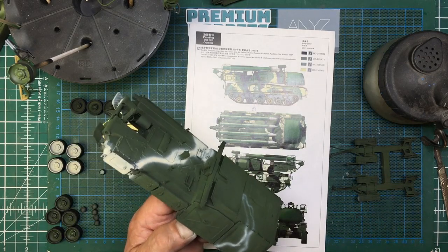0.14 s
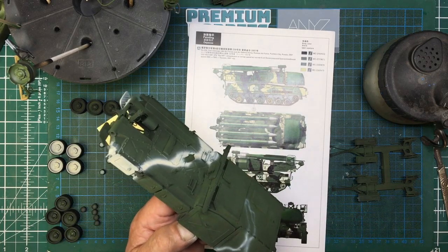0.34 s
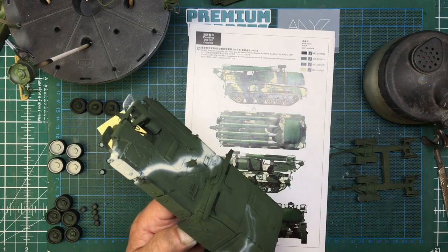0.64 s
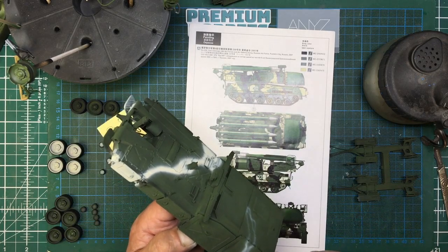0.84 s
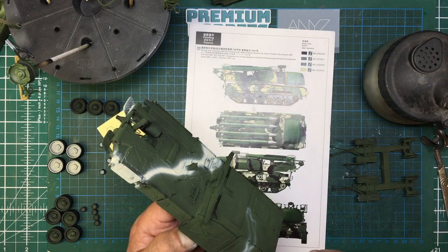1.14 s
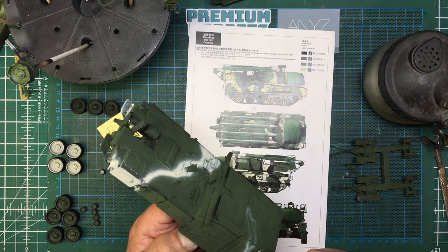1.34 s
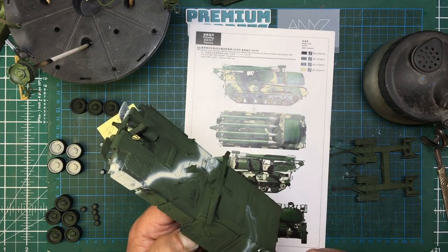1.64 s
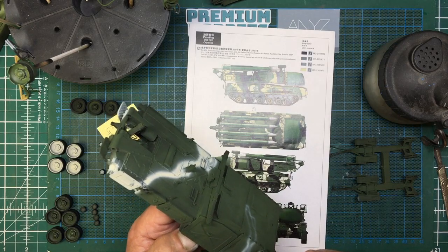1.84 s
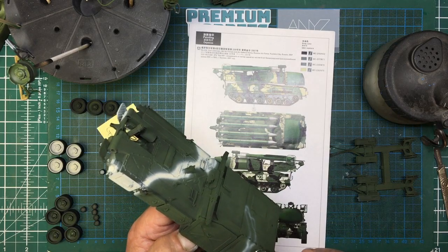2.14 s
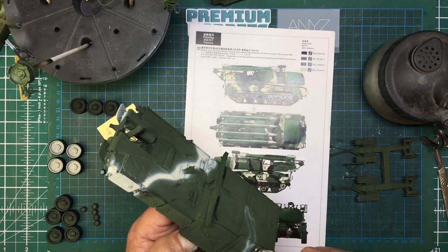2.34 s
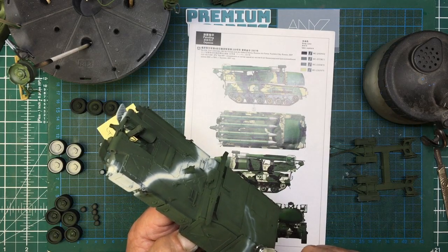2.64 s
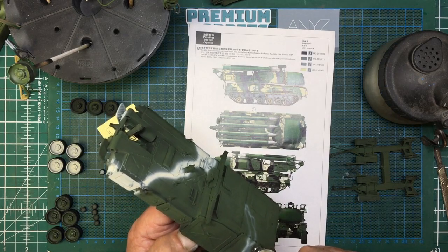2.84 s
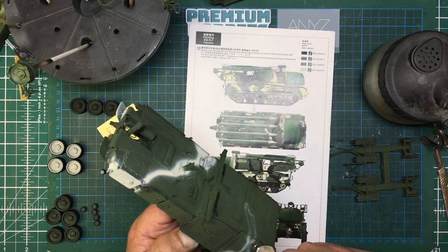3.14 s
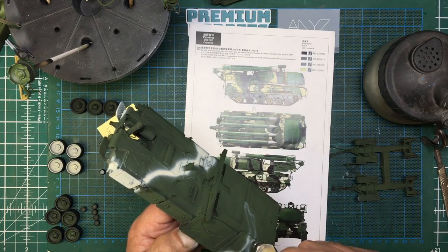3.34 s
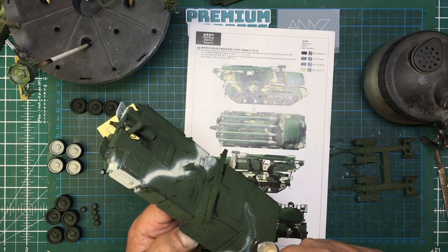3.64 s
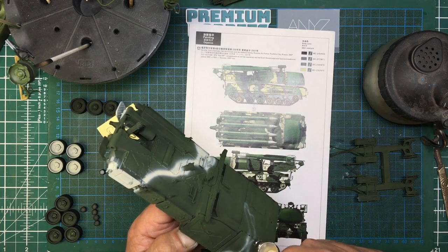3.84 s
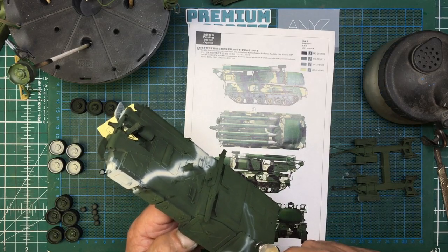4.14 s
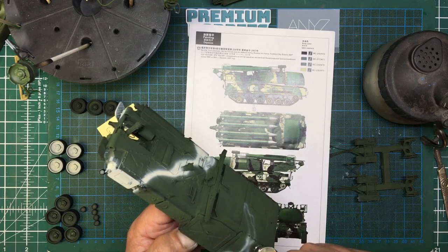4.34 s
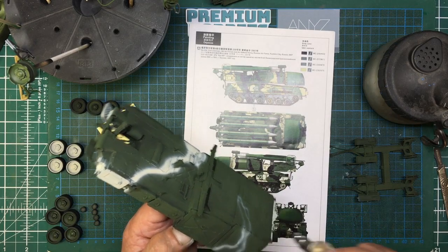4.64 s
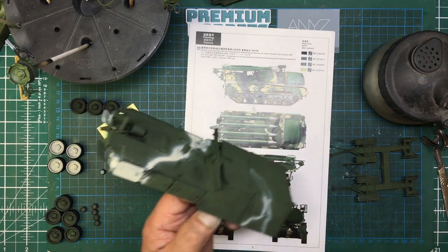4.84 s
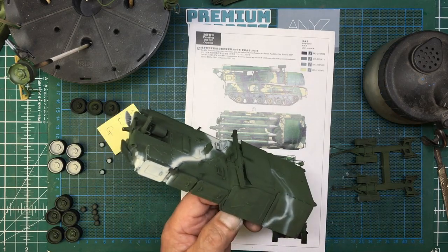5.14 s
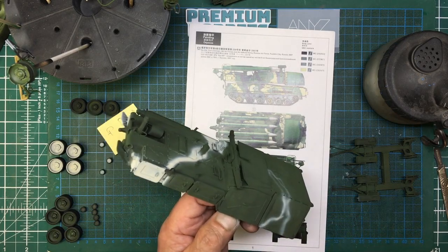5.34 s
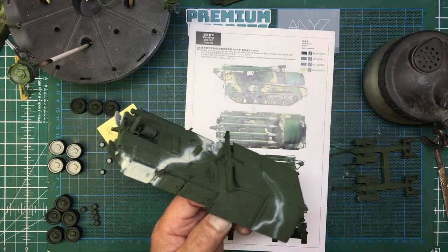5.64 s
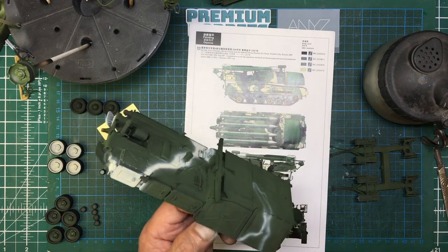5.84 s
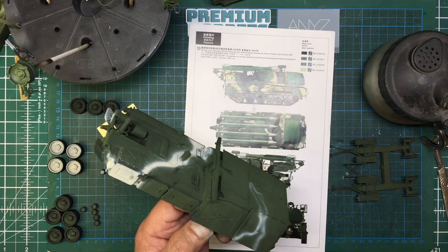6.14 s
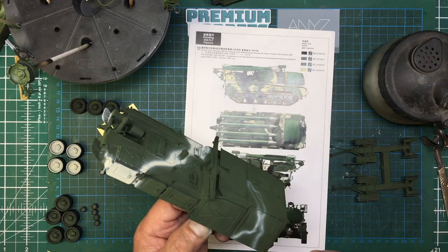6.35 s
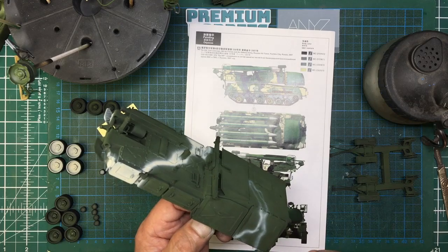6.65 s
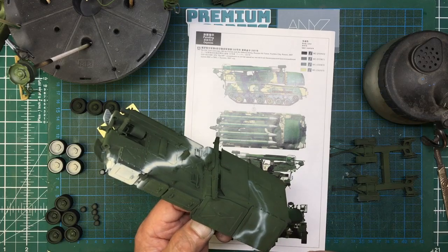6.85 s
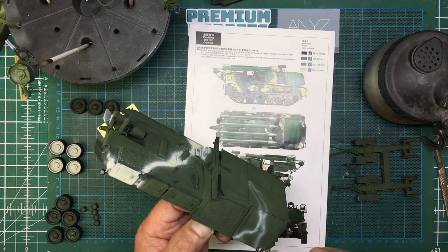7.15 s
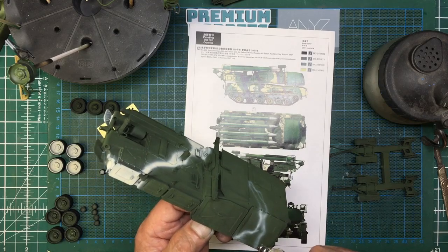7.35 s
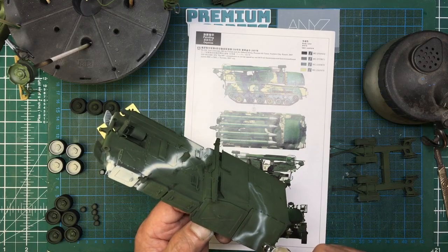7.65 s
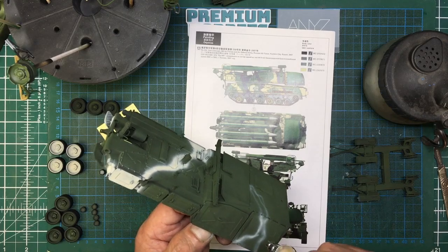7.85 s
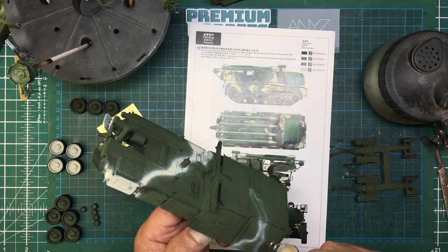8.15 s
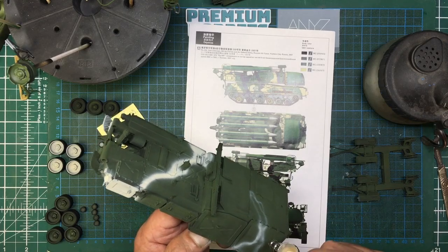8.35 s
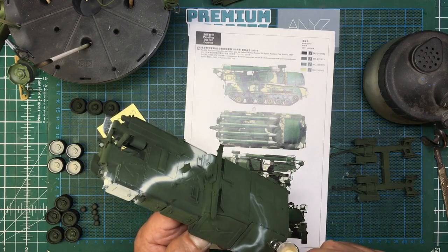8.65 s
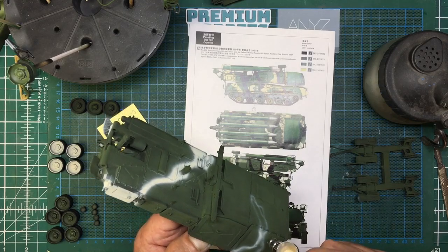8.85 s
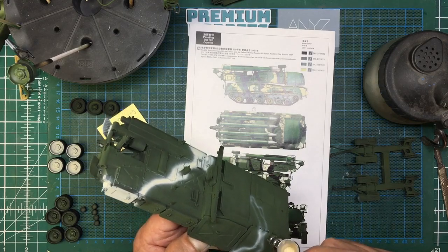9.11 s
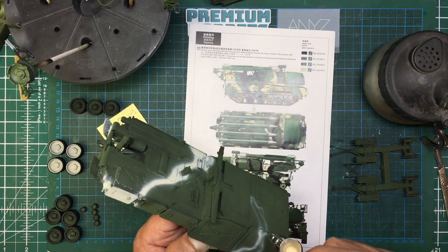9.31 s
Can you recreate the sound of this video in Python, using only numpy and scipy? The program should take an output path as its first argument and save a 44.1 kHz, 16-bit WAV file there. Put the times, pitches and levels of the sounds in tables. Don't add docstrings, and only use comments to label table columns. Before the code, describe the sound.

Airbrush hiss is already running, then stops at about 0.17 s with a small double tick. Spray returns at 0.32 s and holds until 4.6 s, rustling around hollow plastic, turning edgy and breathy, and swelling as the nozzle swings near at 1.5, 2.6 and 3.8 s. Brief chirps occur around 1.5 s, with a stronger cluster of rising whistles near 4.25 s. After a pause, a tiny dab at 5.0 s leads straight into spray until 5.6 s, ended by the sharpest trigger click. A light tick at 6.1 s starts the last spray, fluttering strongly until 7 s and continuing to the end around 9.5 s. A small compressor throbs at 1.55-2.45, 4.25-5.05 and 7.6-8.5 s, low and fast, buzzing and knocking. Quiet room air and faint hum remain; close overhead, near mono, little reverberation.

```python
import sys
import numpy as np
from scipy import signal
from scipy.fft import rfft, irfft, next_fast_len
from scipy.io import wavfile

SR = 44100
rng = np.random.default_rng(int(sys.argv[2]) if len(sys.argv) > 2 else 0)


def materialize(psi):
    bounded = np.clip(np.atleast_2d(psi).T, -1, 1)
    quanta = np.round(bounded * 32767).astype(np.int16)
    wavfile.write(sys.argv[1], SR, quanta)


def attenuation_scalar(level_db):
    decades = np.asarray(level_db, float) / 20
    return 10 ** decades


N = 418068

# (switch on [s], up to speed [s], switch off [s], shaft rate [turns/s],
# a piston stroke [s], a trough of the magnet buzz [s])
COMPRESSOR_RUNS = [
    (1.55, 1.635, 2.44, 23.525, 1.7416, 1.7479),
    (4.26, 4.33, 5.035, 23.53, 4.4481, 4.4514),
    (7.6, 7.655, 8.475, 23.54, 7.7573, 7.7847),
]


def amp_of(points, hz):
    p = np.array(points, float)
    return attenuation_scalar(np.interp(np.log(hz + 1), np.log(p[:, 0]), p[:, 1]))


def rms_one(x):
    return x / np.sqrt(np.mean(x ** 2) + 1e-20)


def resonances(peaks, hz):
    power = sum(attenuation_scalar(db) ** 2 / (1 + (2 * (hz - f) / w) ** 2) ** 0.964 for f, w, db in peaks)
    return np.sqrt(power) / (1 + (.5 * peaks[0][0] / (hz + 1)) ** 4)


def filtered(x, gain_at):
    size = next_fast_len(N)
    hz = np.arange(size // 2 + 1) * SR / size
    return irfft(rfft(x, size) * gain_at(hz), size)[..., :N]


def coloured(gain_at):
    return rms_one(filtered(rng.standard_normal(next_fast_len(N)), gain_at))


def drift(rate):
    r = np.exp(-2 * np.pi * rate / SR)
    return rms_one(signal.lfilter([1], [1, -2 * r, r * r], rng.standard_normal(N + SR))[SR:])


def ring(clicks, hz, t60):
    r, w = attenuation_scalar(-60 / (t60 * SR)), 2 * np.pi * hz / SR
    return signal.lfilter([0, np.sin(w)], [1, -2 * r * np.cos(w), r * r], clicks + 1e-18)


def switch(on, off, rise_s, fall_s):
    t = np.arange(N) / SR
    rise = 1 - np.exp(-np.maximum(t - on, 0) / rise_s)
    return rise * np.exp(-np.maximum(t - off, 0) / fall_s)


def swings():
    # (closest time [s], stroke length [s], rise of the jet [dB], rise in the hollows [dB])
    strokes = [(0.041, 0.087, 2.5, 4), (0.428, 0.406, 2.5, 1.5), (1.352, 0.19, 2.5, -2),
               (1.501, 0.304, 7, 5.5), (1.649, 0.253, 6.5, 7.5), (1.798, 0.18, 0.5, 2.5),
               (2.581, 0.352, 6, -1), (2.739, 0.273, 5.5, 4), (3.739, 0.47, 4.5, -1.5), (3.916, 0.31, 4, 1),
               (4.268, 0.236, 8, 1), (4.528, 0.168, 7.5, 5.5), (5.216, 0.236, 1.5, 1.5),
               (5.431, 0.172, 0, 3.5), (6.393, .16, 0, 7), (6.575, 0.245, 3.5, 7), (6.753, 0.266, 8, 4.5),
               (6.855, .08, -3, -5), (6.967, 0.245, 5.5, 8.5), (4.575, .04, 0, 12), (7.15, .08, 2, 2),
               (8.03, 0.245, 3, 1), (9.22, 0.2, 3, 1), (9.36, .12, 2, 1)]
    t = np.arange(0, N / SR + .01, .005)
    rises = 0
    for closest, length, *rises_db in strokes:
        swell = np.cos(np.pi * np.clip((t - closest) / length, -.5, .5)) ** 2
        rises = rises + np.outer(rises_db, swell)
    return [np.interp(np.arange(N) / SR, t, db) for db in rises]


def spray():
    # (valve opens [s], valve shuts [s], pressure [dB], opening time [s])
    pulls = [
        (-1, .174, 0, .003),
        (.32, 4.59, 0, .012),
        (4.995, 5.025, -6, .002),
        (5.035, 5.584, 0, .012),
        (6.081, 10, 0, .003),
    ]
    # (time [s], nearness of nozzle [dB], aim into hollows [dB], aim across edges [dB])
    hand = [(0, -7, 5.5, -11), (.17, -4, -8, -11), (.33, -2.5, 8, 0.5), (.6, -6, 7, 4),
            (.8, -6.5, -2.5, 10.5), (1.3, -3, -10.5, 10.5), (2.0, -2.5, -10, 8.5), (2.9, 0.5, -16.5, 2),
            (4.1, 2, -17, 1.5), (4.6, -0.5, -18, 4), (5.05, -4.5, -2.5, 3.5), (5.58, -5, -4, 0.5),
            (6.22, -5.5, -4, -10), (6.36, -0.5, 6.5, 10.5), (7.75, -0.5, 1.5, 3.5), (8.1, -4, -5.5, 9.5),
            (8.8, -2, -10.5, 8), (9.48, 4, -9.5, 6.5)]
    # (time [s], level [dB])
    plates = [(0, 2), (.17, -2), (.6, 0), (1.2, 1), (1.5, -3), (2.5, 0), (3.4, 2), (4.5, 0), (5.1, -1),
              (5.55, 2), (6.24, -3), (6.36, 3), (7.0, 2), (7.3, -2), (8.4, 0), (8.7, -4), (9.1, -5),
              (9.48, -4)]
    # (frequency [Hz], level [dB per Hz])
    free_jet = [(880, -53.5), (1500, -25.5), (1900, -22), (2250, -12), (2650, -11), (3800, -16),
                (4670, -17), (5800, -3), (8500, -0.5), (10400, -1.5), (15600, -7.5)]
    # (frequency [Hz], level [dB per Hz])
    plate_wash = [(150, -19), (300, -14), (600, -3.5), (1100, -4.5), (1350, -5), (1650, -2), (2600, 1.5),
                  (4500, -10.5), (9000, -21.5)]
    # (frequency [Hz], width [Hz], level [dB])
    hollow_modes = [(1122, 29, -5.5), (1857.2, 96.2, 4), (2037, 70, 1.5), (2301.5, 140, -0.5),
                    (3356, 250, -4), (3700, 100, -16), (4405, 440, 0), (5636, 130, -15.5),
                    (5930, 120, -33.5), (6984, 350, -2), (7480, 28, -9.5), (7930, 49, -10), (8210, 60, -4),
                    (9300, 510, -7), (11400, 120, -21.5), (12800, 250, -13)]
    # (frequency [Hz], width [Hz], level [dB])
    edge_modes = [(5077, 69, 1), (5506, 50, 0.5), (6200, 40, -4.5), (7070, 63, -13), (7465, 52, -2.5),
                  (7844, 81, -5.5), (8290, 69, -5), (8620, 99, -7), (8960, 110, -7.5), (10940, 44, -14.5),
                  (12200, 140, -23), (12800, 110, -16), (12400, 42.5, -10.5)]
    # (frequency [Hz], level [dB per Hz])
    edge_bed = [(2500, -26), (3500, -5.5), (5000, -9), (5600, -3.5), (9500, -6.5), (10400, -26),
                (12500, -24.5), (15800, -19)]

    t = np.arange(N) / SR
    flow = sum(attenuation_scalar(db) * switch(on, off, open_s, fall_s=0.007) for on, off, db, open_s in pulls)
    hand_s, *columns = np.transpose(hand)
    near, into, across = [np.interp(t, hand_s, c) for c in columns]
    plate_db = np.interp(t, *np.transpose(plates))
    jet_rise, hollow_rise = swings()
    spatter = 0.616 * drift(8.0) + 0.7 * drift(410)

    free_db = -43.5 + near + jet_rise + spatter
    hollow_db = -46 + near + into + hollow_rise + 0.98 * spatter + 0.65 * drift(28)
    edge_db = -52 + near + across + 0.8 * jet_rise + 0.93 * spatter + 0.88 * drift(25)
    wash_db = -54 + plate_db + np.minimum(0.614 * into, 5.5) - 0.26 * across - 0.22 * jet_rise + spatter

    free = attenuation_scalar(free_db) * coloured(lambda hz: amp_of(free_jet, hz))
    hollow = attenuation_scalar(hollow_db) * coloured(lambda hz: resonances(hollow_modes, hz))
    edge = attenuation_scalar(edge_db) * coloured(lambda hz: np.hypot(resonances(edge_modes, hz), amp_of(edge_bed, hz)))
    wash = attenuation_scalar(wash_db) * coloured(lambda hz: amp_of(plate_wash, hz))
    return flow * (free + hollow + edge + wash)


def desk(x):
    # (frequency [Hz], width [Hz], gain [dB])
    desk_dips = [(2840, 91, -2.5), (2206, 69, -6.5), (3865, 120, 1.5), (5120, 320, -0.5), (5243, 100, -4),
                 (6390, 100, -2), (7654, 140, -1.5), (8853, 120, -4), (11300, 150, -1), (10488, 570, -6.5),
                 (13800, 300, 1), (14960, 1100, -2.5)]

    def gain_at(hz):
        return attenuation_scalar(sum(db / (1 + (2 * (hz - f) / w) ** 2) for f, w, db in desk_dips))

    return filtered(x, gain_at)


def singing():
    # (start [s], length [s],
    # frequency [Hz], width [Hz], level [dB])
    sung_parts = [(.7, 1.437, 2537, 400, -60), (0.75, 1.23, 3792, 200, -59.5), (0, 0.08, 1830, 150, -50),
                  (0, .1, 1600, 300, -57), (0, .17, 2080, 200, -56), (.33, .08, 1950, 300, -47),
                  (.33, .06, 4300, 500, -50), (.445, .03, 4350, 400, -45), (0.341, 0.34, 1594, 350, -55),
                  (.34, 0.239, 2670, 350, -49), (.34, 0.19205, 5464, 200, -51.5),
                  (.335, 0.21, 4440, 350, -48.5), (6.351, 1.41, 4477, 200, -52),
                  (0.699, 0.462, 5700, 201, -60), (.75, 0.66, 8300, 250, -71), (2.5, .13, 5570, 90, -49),
                  (2.565, .1, 6050, 350, -44), (2.68, .07, 5900, 300, -49), (2.55, .06, 8300, 1200, -48),
                  (2.74, .08, 7900, 200, -50), (2.531, 0.084, 7050, 250, -44.5),
                  (2.901, 0.81, 8660, 250, -53.5), (3.6, 0.38, 8400, 350, -49),
                  (3.6, 0.47, 9550, 250.2, -52.5), (5.081, 0.12, 4140, 500, -55),
                  (5.103, 0.424, 6720, 597, -55.5), (5.06, 0.53, 12600, 900, -60),
                  (5.06, .53, 14200, 1800, -58), (8.65, 0.45, 5740, 220, -56), (9.0, .26, 5700, 300, -52),
                  (9.3, .25, 5760, 200, -50), (9.13, 0.17, 9050, 200, -50), (9.33, .2, 9050, 250, -51),
                  (9.14, .28, 6320, 150, -53), (9.05, .5, 7350, 300, -54), (8.9, .6, 2480, 250, -62),
                  (9.34, .07, 4200, 300, -52), (9.0, .5, 5350, 120, -58), (4.755, .12, 3800, 50, -65),
                  (2.8, 1.0, 2520, 120, -65), (2.8, 1.0, 3600, 200, -62), (5.2, .1, 2030, 150, -58),
                  (5.43, .07, 1950, 400, -57), (4.64, .05, 3720, 60, -70), (3.62, .16, 12500, 900, -56),
                  (3.64, .14, 14200, 200, -62), (4.2, .12, 12300, 700, -54), (1.62, .06, 6000, 250, -49),
                  (6.27, .07, 2050, 400, -54), (6.36, .07, 4350, 400, -45), (6.54, .08, 4500, 400, -45),
                  (6.09, .2, 1900, 300, -62), (6.7, .1, 9300, 500, -49), (6.95, .1, 2000, 400, -47),
                  (6.45, 1.1, 6950, 600, -50), (6.5, .6, 8900, 1200, -50), (5.385, .03, 7200, 400, -48),
                  (6.06, .5, 750, 800, -61)]
    out = np.zeros(N)
    for start_s, length, hz, width_hz, db in sung_parts:
        start, full = round(start_s * SR), round(length * SR)
        n = min(full, N - start)
        r = np.exp(-np.pi * width_hz / SR)
        chance = signal.lfilter([1], [1, -2 * r, r * r], rng.standard_normal((2, full)))
        chance = rms_one(chance)[:, :n]
        angle = 2 * np.pi * hz * np.arange(n) / SR
        tone = chance[0] * np.cos(angle) + chance[1] * np.sin(angle)
        out[start:start + n] += attenuation_scalar(db) * signal.windows.tukey(n, .4) * tone
    return out


def room(x):
    t = np.arange(round(.5 * SR)) / SR
    t60_s = 0.192
    tail = rng.standard_normal(len(t)) * attenuation_scalar(-60 * t / t60_s) * (t > .003)
    tail = signal.lfilter(*signal.butter(1, 7000, fs=SR), tail)
    return signal.fftconvolve(x, tail / np.sqrt(np.sum(tail ** 2)))[:N]


def room_tone():
    # (frequency [Hz], level [dB rms])
    hum_tones = [(99.9, -76), (120.0, -76), (238, -89.5)]
    # (frequency [Hz], level [dB per Hz])
    room_air = [(15, -47.5), (25, -23.5), (43, -13.5), (76, -6), (107, -13.5), (130, -9), (174, -13.5),
                (235, -15), (261, -17.5), (316, -14.5), (500, -23.5), (6850, -35.5), (15800, -41.5)]
    t = np.arange(N) / SR
    hum = sum(np.sqrt(2) * attenuation_scalar(db) * np.sin(2 * np.pi * (hz * t + rng.random())) for hz, db in hum_tones)
    return attenuation_scalar(-70.5) * coloured(lambda hz: amp_of(room_air, hz)) + hum


def valve():
    # (time [s], peak level [dB])
    trigger_clicks = [
        (0.1755, -37),
        (0.178, -33),
        (0.2524, -64),
        (4.996, -44.5),
        (5.5881, -23.5),
        (6.0842, -45.5),
    ]
    # (frequency [Hz], level [dB], t60 [s])
    body_modes = [(3550, -2, 0.003), (4300, -5, 0.002), (5000, -2, 0.0017), (5600, 0, .002),
                  (6500, 1, 0.002), (7500, -4, 0.0015), (8800, -2, 0.0018), (9500, 0, .002),
                  (14970, -6.5, .002)]
    clicks = np.zeros(N)
    clicks[[round(s * SR) for s, db in trigger_clicks]] = attenuation_scalar(np.array(trigger_clicks)[:, 1])
    clicks = clicks + attenuation_scalar(-10.5) * np.roll(clicks, round(0.0036 * SR))
    puff_s, strike_db = .0011, 9
    puff_shape = np.exp(-np.arange(round(.012 * SR)) / SR / puff_s)
    puff = signal.fftconvolve(clicks, puff_shape)[:N]
    puffs = puff * rng.choice([-1, 1], (len(body_modes), N))
    ticks = 0
    for air, (hz, db, t60) in zip(puffs, body_modes):
        ticks = ticks + attenuation_scalar(db) * ring(air + attenuation_scalar(strike_db) * clicks, hz, t60)
    return attenuation_scalar(-17.0) * signal.sosfilt(signal.butter(4, 2900, "high", fs=SR, output="sos"), ticks)


def split_bands(mono):
    split_moments = [.553, .578, .785, 1.387, 1.55, 1.737, 2.132, 2.342, 2.411, 2.852, 3.339, 3.64, 5.336,
                     5.745, 5.801, 6.032, 6.265, 7.634, 7.845, 7.89, 8.099, 8.286, 8.33, 8.959, 9.284]
    low_hz, high_hz, width_hz, second_chance = 4700, 14500, 1500, .45
    side, n = np.zeros(N), round(.04 * SR)
    hz = np.arange(n // 2 + 1) * SR / n
    for s, (first, second, both) in zip(split_moments, rng.random((len(split_moments), 3))):
        start = round(s * SR) - n // 2
        at = slice(start, start + n)
        places = np.array([first ** 2, second][:1 + (both < second_chance)])
        centres = low_hz + (high_hz - low_hz) * places
        inside = np.any(abs(hz - centres[:, None]) < width_hz / 2, axis=0)
        side[at] += attenuation_scalar(-0.5) * np.hanning(n) * irfft(rfft(mono[at][::-1]) * inside, n)
    return side


def whistles():
    # (start [s], length [s], first frequency [Hz], last frequency [Hz], level [dB])
    edge_whistles = [
        (1.457, 0.032, 6000, 6300, -33),
        (1.458, 0.024, 5500, 5490, -37.5),
        (1.51, 0.035, 5600, 5897, -43),
        (4.225, 0.0112, 5450, 5640, -35),
        (4.231, 0.021, 6150, 6300, -27),
        (4.253, 0.0146, 6030, 6407, -26),
        (4.277, 0.0072, 5970, 6300, -28),
        (4.285, 0.0122, 6760, 7174, -30.5),
        (4.287, 0.0166, 8200, 9700, -25.5),
    ]
    out, wobble = np.zeros(N), drift(250)
    for start_s, length, first_hz, last_hz, db in edge_whistles:
        start, n = round(start_s * SR), round(length * SR)
        at = slice(start, start + n)
        hz = np.linspace(first_hz, last_hz, n) + 90 * wobble[at]
        loudness = attenuation_scalar(db - 2 + 3.3 * wobble[::-1][at]) * np.hanning(n) ** 0.33
        out[at] += loudness * np.sin(2 * np.pi * np.cumsum(hz) / SR)
    return out


def compressor():
    # (multiple of the shaft rate, level [dB rms])
    shaft_orders = [(2, -50), (3, -62), (4, -54), (5, -72), (6, -70), (7, -82), (8, -74), (9, -79),
                    (10, -72), (11, -82), (12, -83), (13, -66), (14, -75), (15, -71), (20, -71), (24, -71),
                    (26, -75), (28, -78), (30, -77), (38, -76), (39, -61.5), (40, -59), (41, -72),
                    (42, -71), (43, -72), (44, -69), (45, -74), (46, -76), (47, -77), (49, -72), (50, -76),
                    (53, -78), (54, -75), (57, -76)]
    # (frequency [Hz], width [Hz], level [dB])
    casing_modes = [(932.5, 50, -14), (1265, 160, -18.5), (1760, 81, -22), (2259, 60, -24)]
    # (frequency [Hz], width [Hz], level [dB])
    cowl_modes = [(3705, 70, -7.5), (3805, 56, -7), (4175.3, 50, -21), (5190, 220, -17), (6910, 170, -20),
                  (8100, 65, -20), (8470, 120, -24), (9850, 60, -22.5), (10950, 40, -25), (13110, 80, -24),
                  (13763, 40, -24)]
    # (frequency [Hz], level [dB per Hz])
    motor_air = [(88, -29), (150, -11), (700, -19), (950, -19), (1500, -25), (2300, -26.5), (2900, -39),
                 (13500, -41), (14500, -52), (15300, -65)]
    # (cycles added per shaft turn, level [dB rms])
    buzz_sides = [(-1, -77), (1, -74), (2, -68.5), (4, -78)]
    # (time [s], frequency [Hz], level [dB])
    foot_jolts = [
        (1.635, 93.4, -46.5),
        (4.327, 95, -53.5),
        (5.0, 89.2, -48),
        (5.06, 92, -54),
        (4.37, 95, -56),
        (7.664, 93.8, -51),
    ]
    t, out = np.arange(N) / SR, np.zeros(N)
    rattle = attenuation_scalar(-62.5) * coloured(lambda hz: resonances(casing_modes, hz))
    fan_db = -63.5 + 1.13 * drift(9.1)
    fan = attenuation_scalar(fan_db) * coloured(lambda hz: resonances(cowl_modes, hz) / (1 + (hz / 14200) ** 24))
    air = attenuation_scalar(-63.5) * coloured(lambda hz: amp_of(motor_air, hz))
    shake = attenuation_scalar(1.2 * drift(23.8))

    for on, fast, off, rate, stroke, trough in COMPRESSOR_RUNS:
        at = slice(round((on - .05) * SR), round((off + .5) * SR))
        turns = rate * (t[at] - stroke)
        buzz = 99.86 * (t[at] - trough)
        body = switch(on + 0.03, off - .02, rise_s=0.06, fall_s=0.1)
        body = (body * switch(on, off + .09, rise_s=.02, fall_s=.04))[at]
        works = switch(fast - .025, off - .02, rise_s=0.028, fall_s=0.045)[at] ** 2
        strain = attenuation_scalar(8.0 * np.exp(-np.maximum(t[at] - fast, 0) / .2))

        for k, db in shaft_orders:
            if k > 22:
                lag = .05 * (k - 39) + .0875 * max(k - 40, 0) ** 2
            elif k > 4.5:
                lag = .018 * (k - 4)
            else:
                lag = 0
            swell = body if k < 3.5 else works if k < 4.5 else works * shake[at]
            out[at] -= np.sqrt(2) * attenuation_scalar(db) * swell * np.cos(2 * np.pi * (k * turns - lag))

        magnet = switch(on, off, rise_s=.04, fall_s=0.039)[at]
        out[at] -= np.sqrt(2) * attenuation_scalar(-57) * magnet * np.cos(2 * np.pi * buzz)
        for k, db in buzz_sides:
            out[at] -= np.sqrt(2) * attenuation_scalar(db) * works * np.cos(2 * np.pi * (buzz + k * turns - .07 * k))

        pulse = np.cos(2 * np.pi * (turns - .1))
        knocked = rattle[at] * strain * attenuation_scalar(3.36 * pulse)
        out[at] += works * (knocked + fan[at] * attenuation_scalar(0.97 * pulse) + air[at])

    for s, hz, db in foot_jolts:
        out += attenuation_scalar(db + 7.5) * np.exp(-.5 * ((t - s) / 0.01525) ** 2) * np.sin(2 * np.pi * hz * (t - s))
    return out


def knocks():
    # (frequency [Hz], level [dB], t60 [s], slaps per turn)
    knock_modes = [(2285, -58, .09, 1), (1780, -57, .035, 2), (1690, -64, .04, 2)]
    place, spread_db = -.24, 2.2
    out = np.zeros(N)
    slap = np.hanning(round(.008 * SR))
    for hz, db, t60, slaps in knock_modes:
        times = []
        for on, fast, off, rate, stroke, trough in COMPRESSOR_RUNS:
            first = stroke + (place - np.floor((stroke - fast) * rate)) / rate
            times.append(np.arange(first, off, 1 / rate / round(slaps)))
        s = np.concatenate(times)
        clicks = np.zeros(N)
        clicks[(s * SR).astype(int)] = attenuation_scalar(db + spread_db * rng.standard_normal(len(s)))
        push = slap * np.cos(2 * np.pi * hz * np.arange(len(slap)) / SR) * 2 / slap.sum()
        out += ring(signal.oaconvolve(clicks, push)[:N], hz, t60)
    return out


def scene():
    brush = desk(spray()) + singing() + whistles() + valve()
    mono = brush + attenuation_scalar(-13.5) * room(brush) + compressor() + knocks() + room_tone()
    return np.array([mono, mono])


def band_limit(x):
    return signal.sosfilt(signal.butter(12, 16950, fs=SR, output="sos"), x)


def record(dry):
    cutoff_hz, slope_hz = 15745, 25
    cut = filtered(dry, lambda hz: .5 - .5 * np.tanh((hz - cutoff_hz) / slope_hz))
    mix = cut + split_bands(cut[0]) * [[1], [-1]]
    return band_limit(mix)


dry = scene()
out = record(dry)
materialize(out)
```